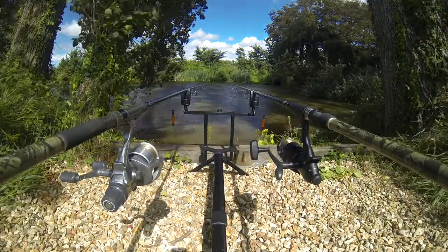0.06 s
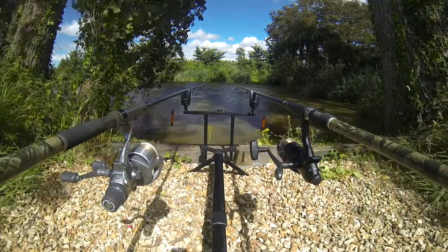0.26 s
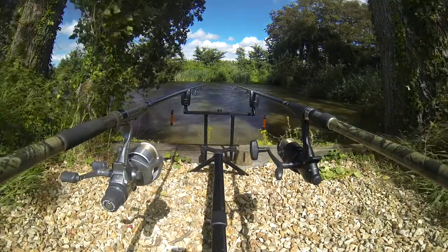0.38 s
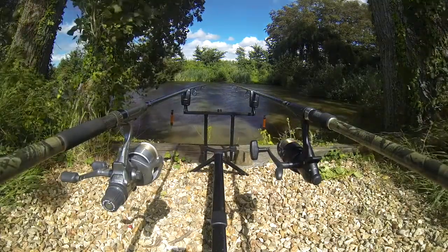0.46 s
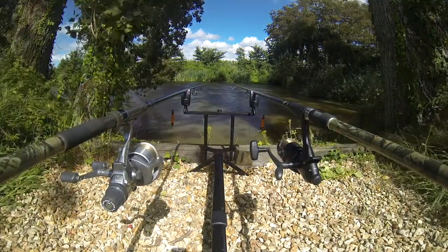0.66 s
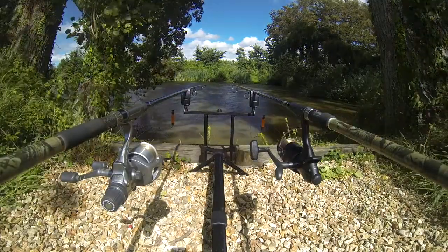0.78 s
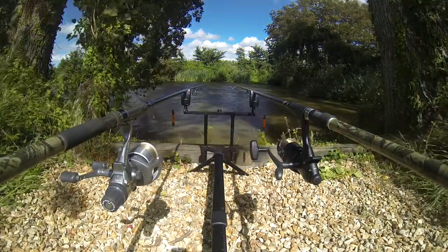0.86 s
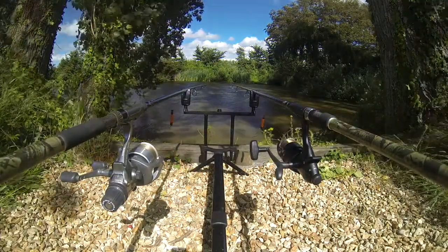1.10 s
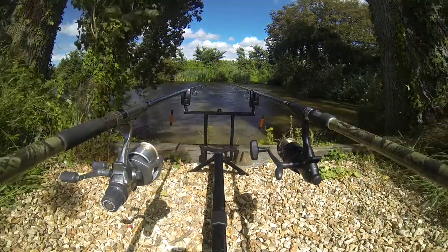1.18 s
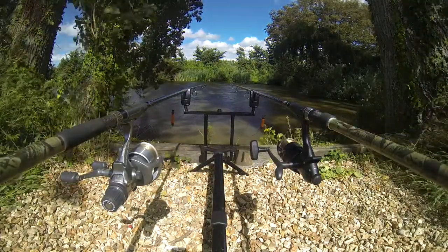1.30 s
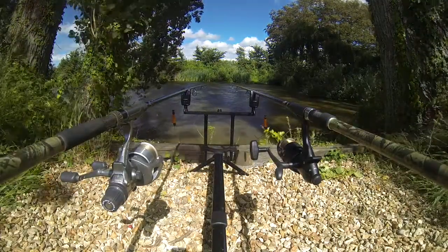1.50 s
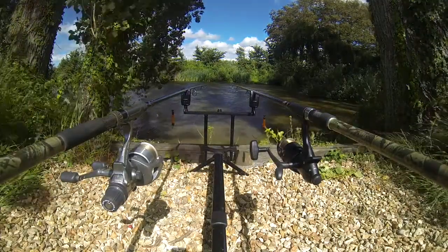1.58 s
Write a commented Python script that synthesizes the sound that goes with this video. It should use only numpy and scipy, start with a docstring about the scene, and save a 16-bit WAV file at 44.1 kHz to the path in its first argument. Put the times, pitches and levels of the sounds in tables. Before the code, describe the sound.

Gusty wind hits the microphone beside a lake, rumbling and thumping, easing for a moment, then returning and dying down. A softer, smooth rustle of leaves and a faint low rush of air continue throughout.

```python
"""Lakeside breeze in the trees

Countless leaves merge into one smooth, steady rustle over a low rush of distant air.
Gusts reach the microphone in two waves of lumpy rumble with a flutter of small eddies on top,
and a few strong eddies hit it as low bumps."""
import sys
import numpy as np
from scipy import signal
from scipy.fft import rfft, irfft
from scipy.io import wavfile
from scipy.ndimage import uniform_filter1d

SR = 44100
rng = np.random.default_rng(int(sys.argv[2]) if len(sys.argv) > 2 else 0)


def dump_mix(stems):
    """Bounce the given channels to the path in sys.argv[1] as a 16-bit WAV at rate SR."""
    frames = np.atleast_2d(stems).T  # one column per channel
    limited = np.clip(frames, -1, 1)  # hard clip at full scale
    pcm = np.round(limited * 32767).astype(np.int16)
    wavfile.write(sys.argv[1], SR, pcm)


N = 72765
TIME = np.arange(N) / SR


def from_db(db):
    """Decibels to gain."""
    return 10 ** (np.asarray(db) / 20)


def unit_power(x):
    """Scale to an RMS of one."""
    return x / np.sqrt(np.mean(x ** 2) + 1e-20)


def envelope(rows):
    """A fader ride through (time [s], level [dB]) points."""
    return from_db(np.interp(TIME, *np.transpose(rows)))


def noise(spectrum):
    """Unit-power noise coloured by (frequency [Hz], relative level [dB]) points."""
    hz, db = np.transpose(spectrum)
    bin_hz = np.maximum(np.arange(N + 1) * SR / (2 * N), 1)
    colour = from_db(np.interp(np.log(bin_hz), np.log(hz), db))
    white = rng.standard_normal(2 * N)
    return unit_power(irfft(rfft(white) * colour)[:N])


def turbulence(spectrum, span_s=0.031, evenness=0.72):
    """Irregular eddies of similar strength: noise partly evened out by its own short-term power."""
    raw = noise(spectrum)
    power = uniform_filter1d(np.abs(signal.hilbert(raw)) ** 2, int(span_s * SR))
    return unit_power(raw / (power + 1e-9) ** (evenness / 2))


# Tone of the leaves, as the microphone colours it: (frequency [Hz], relative level [dB])
LEAF_SPECTRUM = [(290, -50), (500, -1), (600, -4), (740, 2), (935, -3), (1110, -1), (1370, -8), (1900, -4),
                 (2200, -7), (2640, -14.5), (3180, -8), (3800, -13.5), (4410, -20), (5300, -20),
                 (6210, -26.5), (6760, -26), (7680, -31.5), (8800, -28.5), (9600, -35.5), (10700, -34),
                 (11800, -41.5), (13500, -40.5), (14800, -47), (15300, -52)]
# Low rush of distant wind: (frequency [Hz], relative level [dB])
AIR_SPECTRUM = [(15, -17.5), (55, 0), (110, -3), (190, -5.5), (320, -3.5), (430, -4.5), (560, -22),
                (900, -36), (3000, -110)]

def trees(leaves_db=-33, air_db=-35.5):
    """The steady bed: many leaves blur into one rustle, with the low rush of air behind it."""
    rustle = from_db(leaves_db) * noise(LEAF_SPECTRUM)
    rush = from_db(air_db) * noise(AIR_SPECTRUM)
    return rustle + rush


# Strength of the gusts, in two waves: (time [s], level [dB])
GUST_ENVELOPE = [(0, -31), (.08, -39), (.21, -36), (.255, -13.5), (.315, -19.5), (.38, -22.5), (.415, -17),
                 (.5, -19), (.55, -8.5), (.585, -13), (.65, -23.5), (.75, -22), (.815, -43), (.858, -25.5),
                 (.895, -29.5), (.92, -22), (1.1, -17), (1.19, -16.5), (1.235, -25), (1.295, -14),
                 (1.33, -20), (1.39, -14), (1.445, -19.5), (1.505, -34), (1.65, -42)]
# Deep body of the turbulence: (frequency [Hz], relative level [dB])
RUMBLE_SPECTRUM = [(10, -10.5), (20, -0.5), (32, 1), (58, -0.5), (90, -5), (130, -13), (190, -31),
                   (300, -41), (600, -59), (2000, -120)]
# Quick flurries of small eddies: (time [s], level [dB])
FLUTTER_ENVELOPE = [(0, -57), (.22, -43.5), (.255, -34), (.31, -26), (.38, -45), (.465, -25.5), (.5, -36),
                    (.585, -33.5), (.66, -49), (.722, -29.5), (.78, -48), (.855, -28.5), (.9, -43),
                    (1.06, -45), (1.105, -31), (1.22, -50), (1.305, -34), (1.362, -26.5), (1.43, -49),
                    (1.65, -59)]
# Upper-bass tone of the small eddies: (frequency [Hz], relative level [dB])
FLUTTER_SPECTRUM = [(20, -34), (60, -29), (120, -3), (170, 0), (260, -3), (350, -15), (550, -17),
                    (1000, -51), (3000, -110)]

def buffeting():
    """Gusts rumble on the microphone while small eddies flutter above them."""
    rumble = envelope(GUST_ENVELOPE) * turbulence(RUMBLE_SPECTRUM)
    flutter = envelope(FLUTTER_ENVELOPE) * turbulence(FLUTTER_SPECTRUM)
    return rumble + flutter


# Eddy hits, before the soft limit: (time [s], peak level [dB], half width [s], churn level [dB])
EDDY_HITS = [(0.521, -5, 0.0019, -15.5), (.856, -13.5, 0.0021, -27.5), (1.092, -10, 0.0024, -38),
             (1.1634, -5.5, 0.00446, -9.5), (1.353, -4.5, .0026, -30)]
# Low-mid churn inside an eddy: (frequency [Hz], relative level [dB])
CHURN_SPECTRUM = [(20, -40), (80, -24), (170, -2.5), (250, -3), (400, -11.5), (680, -20), (1000, -38),
                  (3000, -100)]

def eddy_bumps(churn_half_width_s=0.005):
    """Each strong eddy sucks, then pushes on the microphone, with a short churn at its core."""
    out = np.zeros(N)
    churn = turbulence(CHURN_SPECTRUM)
    for hit_s, peak_db, half_width_s, churn_db in EDDY_HITS:
        offset = (TIME - hit_s) / half_width_s
        suck_push = offset * np.exp((1 - offset ** 2) / 2)  # swings to -1, then +1
        churn_fade = np.exp(-((TIME - hit_s) / churn_half_width_s) ** 2 / 2)
        out += from_db(peak_db) * suck_push
        out += from_db(churn_db) * churn * churn_fade
    return out


def soft_limit(wind, ceiling=0.82):
    """Round off the strongest pushes of the wind."""
    return wind / (1 + (wind / ceiling) ** 6) ** (1 / 6)


def scene():
    """Mono mix: the bed of trees under soft-limited wind on the microphone."""
    bed = trees()
    wind = soft_limit(buffeting() + eddy_bumps())
    return (bed + wind)[None]


def record(dry, cutoff_hz=15250):
    """A steep low-pass takes off the top of the treble."""
    low_pass = signal.ellip(12, 0.1, 80, cutoff_hz, fs=SR, output="sos")
    return signal.sosfilt(low_pass, dry)


dry = scene()
out = record(dry)
dump_mix(out)
```